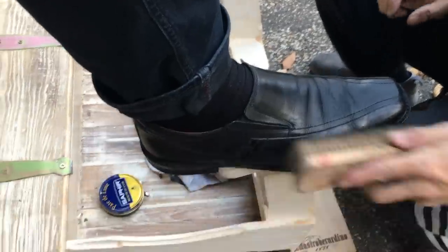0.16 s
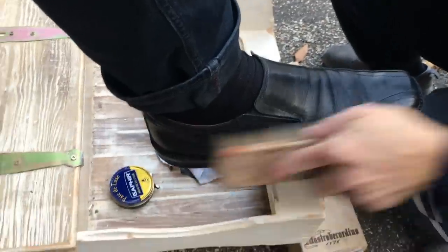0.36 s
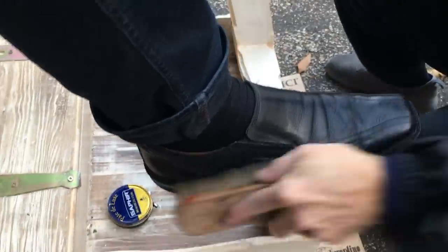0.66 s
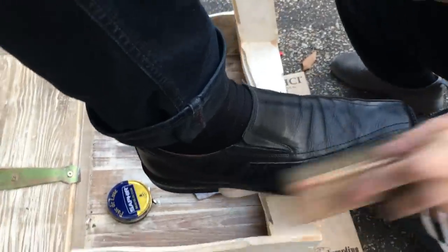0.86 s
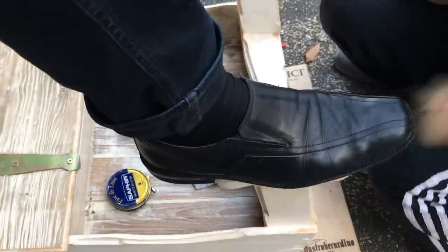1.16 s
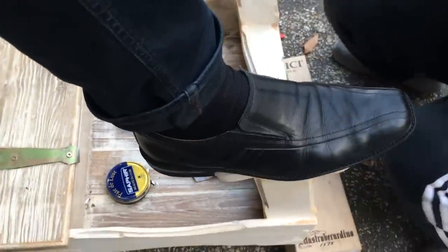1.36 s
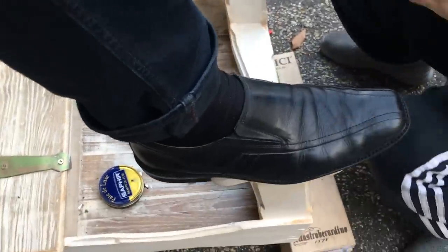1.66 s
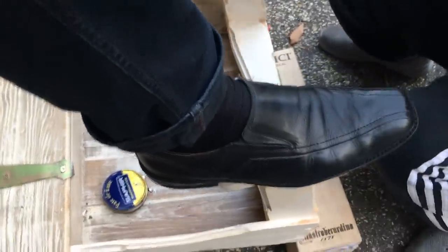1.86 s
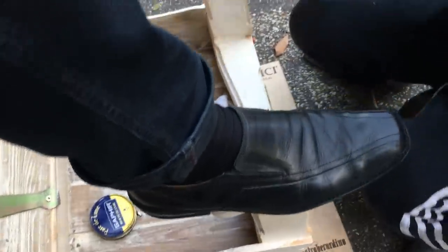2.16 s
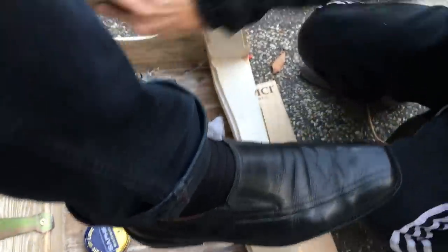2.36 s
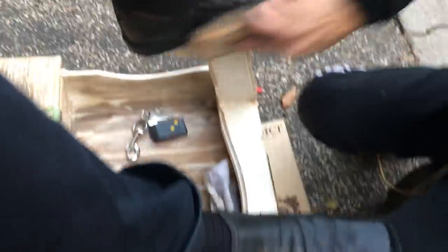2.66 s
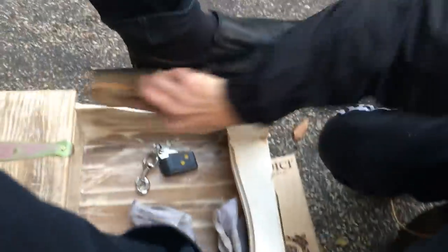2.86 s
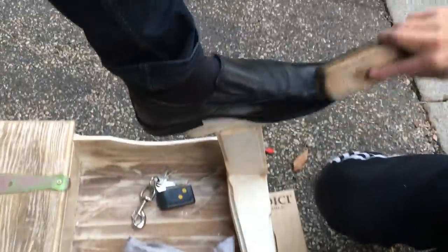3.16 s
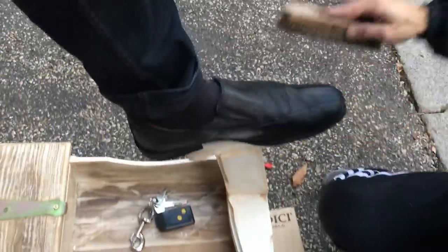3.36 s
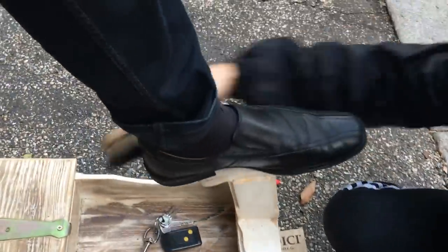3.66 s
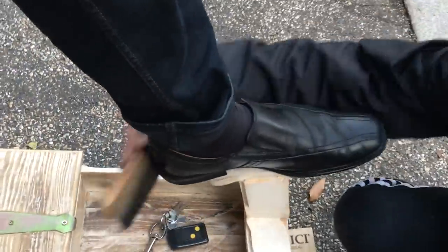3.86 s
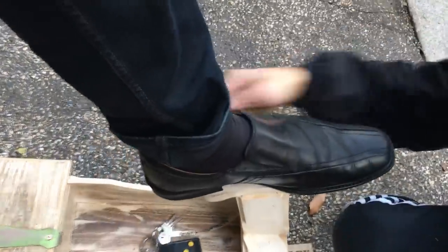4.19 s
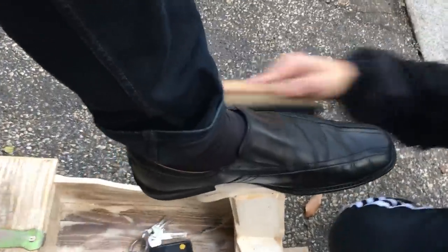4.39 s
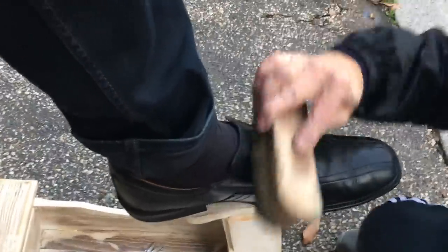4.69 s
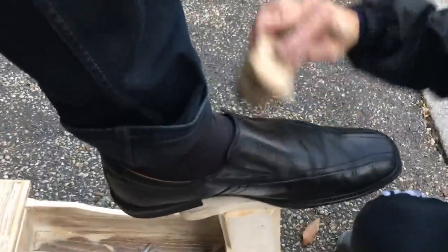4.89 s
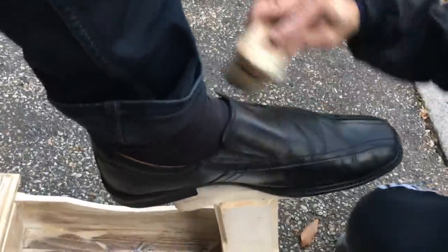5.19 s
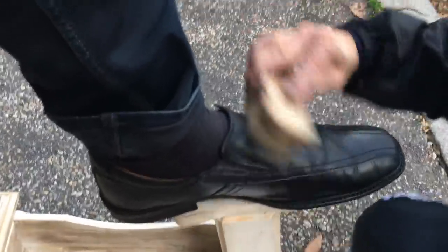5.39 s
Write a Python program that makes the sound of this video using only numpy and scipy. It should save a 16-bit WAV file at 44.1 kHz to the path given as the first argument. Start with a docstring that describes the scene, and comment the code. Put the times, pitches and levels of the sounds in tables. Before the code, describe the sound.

On a street with a steady low traffic rumble, a far engine swells and fades while a shoe brush sweeps quickly over leather, heard from close by. The first bristly swishes sound full and slightly hollow. After a short lull the brushing carries on, finishing in lighter, thinner swipes. Scattered short knocks of the wooden brush against the shoe punctuate the strokes, the sharpest coming early.

```python
"""Hissing strokes of a bristle brush buffing a waxed leather shoe, close by, at a street stand.
Each stroke is a dense patter of slipping bristles that swells and fades with hand speed.
Now and then the brush's wooden back knocks the shoe, ringing the block and thumping the shoe.
Traffic murmurs behind it, and a distant engine pulls away at the start."""
import sys
import numpy as np
from scipy import signal
from scipy.fft import rfft, irfft
from scipy.io import wavfile
from scipy.ndimage import uniform_filter1d

SR = 44100
rng = np.random.default_rng(int(sys.argv[2]) if len(sys.argv) > 2 else 0)


def inscribe(sig):
    """Save sig as 16-bit PCM at rate SR to the path in sys.argv[1].

    A 1-D sig is mono; a 2-D sig holds one channel per row.
    Samples are clipped to [-1, 1] before scaling.
    """
    pcm = np.round(np.clip(np.atleast_2d(sig).T, -1, 1) * 32767)
    wavfile.write(sys.argv[1], SR, pcm.astype(np.int16))


N = 244314
T = np.arange(N) / SR


def undb(db):
    """Decibels to gain."""
    return 10 ** (np.asarray(db) / 20)


def unit(x):
    """Scale to rms 1."""
    return x / np.sqrt(np.mean(x ** 2) + 1e-18)


def colour(x, points):
    """Filter by a spectrum of (f/Hz, gain/dB) points."""
    hz, db = np.transpose(points)
    f = np.arange(len(x) // 2 + 1) * SR / len(x)
    return irfft(rfft(x) * undb(np.interp(np.log(f + 1), np.log(hz), db)), len(x))


def drift(rate_hz, size=2000):
    """Random drift with spread near 1, rate_hz new values a second."""
    return 1.44 * np.interp(T * rate_hz, np.arange(size), rng.standard_normal(size))


def ring(modes, t):
    """Impulse response of damped modes (f/Hz, level/dB, t60/s)."""
    return sum(undb(db - 60 * t / t60) * np.sin(2 * np.pi * hz * t + rng.uniform(0, 2 * np.pi))
               for hz, db, t60 in modes)


def add(out, start_s, x):
    """Mix x into out from start_s."""
    i = int(start_s * SR)
    out[i:i + len(x)] += x[:max(N - i, 0)]


def traffic(level_db=-40.5, waver_db=1.0, split_hz=220):
    """Steady tyre noise above a restless rumble that eases as the engine leaves."""
    # street noise: f/Hz, level/dB
    spectrum = [(27, -46), (39, -11), (56, 4), (85, -9), (130, -11.5), (200, -14.5), (400, -27), (650, -25),
                (1100, -21.5), (1900, -27.5), (2800, -36.5), (4000, -42.5), (7000, -50.5), (15000, -58)]
    # rumble weight: t/s, gain/dB
    rumble_curve = [(0, 1.5), (1.2, 1.5), (1.6, 2), (3, 0), (4.2, -0.5), (5.54, -1)]
    noise = unit(colour(rng.standard_normal(N), spectrum))
    rumble = signal.sosfiltfilt(signal.butter(2, split_hz, fs=SR, output="sos"), noise)
    tyres = noise - rumble
    rumble_db = np.interp(T, *np.transpose(rumble_curve)) + waver_db * drift(9.8)
    return undb(level_db) * (rumble * undb(rumble_db) + tyres)


def distant_engine(waver_db=1.0):
    """Only low exhaust orders carry this far; they rise a little in pitch, swell once and fade."""
    # engine speed: t/s, cycle rate/Hz
    revs = [(0, 37.3), (.42, 38.1), (.72, 40), (1.5, 41.5)]
    # exhaust orders: multiple of cycle rate, level/dB, loudest/s, half-length/s
    exhaust = [(2, -41, 0.24, 0.32), (3, -43.5, 0.99, 0.54), (4, -49, 0.24, 0.58)]
    phase = 2 * np.pi * np.cumsum(np.interp(T, *np.transpose(revs))) / SR
    out = np.zeros(N)
    for order, db, loudest_s, half_s in exhaust:
        swell = np.exp(-((T - loudest_s) / half_s) ** 2)
        out += undb(db + waver_db * drift(9.65)) * swell * np.sin(order * phase)
    return np.sqrt(2) * out


def knocks(crack_db=-5, chatter=0.39, detune=0.043, scatter_db=-9, scatter_s=0.011, level_span_s=0.004):
    """A blow and its chatter ring the brush block and thump the shoe; dull contacts thump most."""
    # wooden back on shoe: t/s, level/dB, brightness/Hz, contact decay/s, thump pitch/Hz
    blows = [(0.262, -34, 2720, 0.014, 670), (0.8673, -26.5, 3900, 0.0021, 405),
             (1.047, -39.5, 1990, 0.0012, 243), (1.839, -34.5, 3000, 0.0028, 260),
             (2.055, -39.5, 3170, 0.0011, 580), (2.067, -34.5, 3100, 0.0062, 630),
             (2.086, -39, 2010, .005, 530), (2.166, -42.5, 2200, 0.0085, 297),
             (2.766, -35, 2400, 0.0031, 228), (3.813, -41, 1900, 0.0071, 182),
             (4.603, -40.5, 7360, 0.00089, 302), (4.644, -36, 5460, 0.0022, 290),
             (4.6544, -28.5, 2370, 0.0029, 188), (4.666, -39, 2310, .019, 394),
             (5.026, -36.5, 5000, 0.0095, 293)]
    # brush block modes: f/Hz, level/dB, t60/s
    block_modes = [(880, -2, 0.016), (1060, -5.5, 0.021), (1290, 1, 0.017), (1570, -3.5, 0.023),
                   (1870, -7, 0.012), (2050, 3, 0.023), (2490, -21, 0.011), (2890, -0.5, 0.0083),
                   (3490, -1, 0.03), (3980, -19, 0.0069), (5420, 2, 0.018), (6140, -3, 0.013)]
    # shoe modes, pitched by the spot struck: multiple of thump pitch, level/dB, t60/s
    shoe_modes = [(1, 3.5, 0.091), (1.31, 4, 0.057), (1.9, 0, 0.067)]
    out, t = np.zeros(N), T[:SR // 6]
    for start_s, level_db, bright_hz, contact_s, thump_hz in blows:
        # the fingers load the block differently at every blow
        gripped = [(hz * np.exp(detune * rng.standard_normal()), db, t60) for hz, db, t60 in block_modes]
        block = ring(gripped, t)
        shoe = ring([(k * thump_hz, db, t60) for k, db, t60 in shoe_modes], t)
        stand = rng.standard_normal(len(t)) * np.exp(-t / scatter_s)  # dense reflections
        contact = chatter * rng.standard_normal(len(t)) * np.exp(-t / contact_s)
        contact[0] += 1  # the blow itself
        band = signal.butter(2, [0.058 * bright_hz, bright_hz], "band", fs=SR, output="sos")
        force = signal.sosfilt(band, contact)
        wood, thump, scatter = (unit(signal.fftconvolve(force, response)[:len(t)])
                                for response in (block, shoe, stand))
        thump_db = 1 - 13.5 * np.log2(bright_hz / 1950)
        knock = wood + undb(crack_db) * unit(force) + undb(thump_db) * thump + undb(scatter_db) * scatter
        add(out, start_s, knock * undb(level_db) * np.sqrt(level_span_s / t[-1]))
    return out


def bristle_slips(flicks_per_s=12000, spread_db=2.5, tuft_db=0.5, grip_db=1.5):
    """Single bristles flick free over a smooth rub; whole tufts catch and let go together."""
    bend = np.minimum(rng.exponential(size=N), 3.5)
    slipping = rng.random(N) < flicks_per_s / SR
    flicks = slipping * rng.standard_normal(N) * undb(spread_db * bend)
    rub = rng.standard_normal(N)
    return unit(unit(flicks) + rub) * undb(tuft_db * drift(170) + grip_db * drift(28))


def tuft_shimmer(x, depth_db=1.5, frame=512):
    """Tufts of different length hiss at their own pitches; the colour shimmers as they come and go."""
    bands = signal.stft(x, nperseg=frame)[2]
    tufts = uniform_filter1d(rng.standard_normal(bands.shape), size=4, axis=0)  # over frequency
    tufts = uniform_filter1d(tufts, size=5, axis=1)  # over time
    return signal.istft(bands * undb(depth_db * unit(tufts)), nperseg=frame)[1][:N]


def sweep_speed(start_s, fastest_s, end_s, turn_s=0.019, rise_power=1.46, fall_power=1.38):
    """The hand speeds up after one turn and slows into the next; bristles slip on through each turn."""
    angle = np.interp(T, [start_s - turn_s, fastest_s, end_s + turn_s], [0, np.pi / 2, np.pi])
    arch = np.where(angle < np.pi, np.sin(angle), 0)
    return arch ** np.where(T < fastest_s, rise_power, fall_power)


def swipe_speed(lands_s, lifts_s, bite_s=0.03, release_s=0.028, sag_db_per_s=-9):
    """The bristles bite quickly, slide on as the hand eases off, and leave the leather."""
    contact = np.clip((T - lands_s) / bite_s, 0, 1) * np.clip((lifts_s - T) / release_s, 0, 1)
    middle_s = (lands_s + lifts_s) / 2
    return contact * undb(sag_db_per_s * (T - middle_s))


def brush(body_hz=1800, centre_hz=5000, sheen_hz=11000, tip_hz=7500, tip_power=0.49):
    """Strokes swell and fade with hand speed; the shoe's flank sounds hollow, the toe cap thin."""
    # bristle hiss on leather: f/Hz, level/dB
    spectrum = [(150, -4), (500, -10.5), (850, -6.5), (1200, -3), (1900, -2), (2700, -3), (3700, -2.5),
                (6000, -3), (7300, -6.5), (8700, -6.5), (12000, -6.5), (15000, -9.5)]
    # long strokes, turn to turn: start/s, fastest/s, end/s, level/dB, leather body/dB
    sweeps = [(-.15, 0.045, 0.19, -46.5, 7), (0.222, 0.283, 0.34, -47.5, 8.5), (0.36, 0.43, 0.57, -45, 10),
              (0.567, 0.634, 0.73, -45.5, 11.5), (0.727, 0.769, 0.89, -43.5, 8),
              (0.877, 0.977, 1.045, -44.5, 8.5), (1.055, 1.105, 1.274, -42.5, 6.5),
              (1.727, 1.878, 2.057, -46.5, 7.5), (2, 2.183, 2.245, -47, 5), (2.252, 2.308, 2.46, -48, 8.5),
              (2.413, 2.61, 2.667, -47.5, 5.5), (2.688, 2.742, 2.865, -44.5, 8),
              (2.902, 3.028, 3.19, -45.5, 7), (3.722, 3.814, 3.9, -48.5, 2), (3.917, 3.943, 4.02, -47, 0.5),
              (3.972, 4.102, 4.185, -49, -1), (4.18, 4.292, 4.36, -46, -1.5),
              (4.351, 4.446, 4.56, -41.5, 1.5), (4.727, 4.833, 4.875, -42.5, -9.5)]
    # swipes and light drags: lands/s, lifts/s, level/dB, leather body/dB
    swipes = [(0.138, 0.237, -57, 6), (1.202, 1.252, -41.5, -3), (1.25, 1.498, -61, -6),
              (1.578, 1.77, -60, -3), (1.737, 1.83, -51.5, 5), (3.09, 3.448, -53, 1),
              (3.237, 3.297, -51, -1), (3.524, 3.86, -52, 3.5), (4.6, 4.67, -52.5, 0),
              (4.63, 4.745, -45.5, -0.5), (4.829, 4.876, -43, 2), (4.923, 5, -51.5, -5),
              (4.964, 5.08, -40.5, 1), (5.075, 5.21, -41, -4.5), (5.269, 5.387, -40, -1),
              (5.38, 5.527, -44, 0)]
    # top treble as the brush works round the shoe: t/s, gain/dB
    sheen = [(0, 3.5), (1.22, 1.5), (1.4, -3.5), (2, 3), (2.75, 6), (3.05, 3.5), (3.25, -2.5), (4.4, 0),
             (5.54, -2.5)]
    hiss = unit(colour(tuft_shimmer(bristle_slips()), spectrum))
    highpass = signal.butter(2, tip_hz, "high", fs=SR, output="sos")
    strokes = [(sweep_speed(*times), db, body_db) for *times, db, body_db in sweeps]
    strokes += [(swipe_speed(*times), db, body_db) for *times, db, body_db in swipes]
    out = np.zeros(N)
    for motion, level_db, body_db in strokes:
        during = np.flatnonzero(motion > 0)
        speed = motion[during]
        patch = hiss[(during + rng.integers(N)) % N]  # each stroke bends other bristles
        sheen_db = np.interp(T[during].mean(), *np.transpose(sheen))
        rub = colour(patch, [(body_hz, body_db), (centre_hz, 0), (sheen_hz, sheen_db)])
        # the finest tip flicks need speed, so turns are duller
        tips = signal.sosfiltfilt(highpass, rub, padlen=0)
        out[during] += (rub - tips + tips * speed ** tip_power) * speed * undb(level_db)
    return out


def scene():
    """All sources at one microphone, on two equal channels."""
    return np.tile(brush() + knocks() + traffic() + distant_engine(), (2, 1))


def record(dry):
    """A phone's microphone port notches the treble twice; a steep low-pass cuts the top."""
    # port response: f/Hz, gain/dB
    port = [(4300, -0.5), (4850, -4), (5400, -1.5), (9500, 3), (10200, -1.5), (10900, 1)]
    top_hz = 15850
    heard = np.array([colour(channel, port) for channel in dry])
    return signal.sosfilt(signal.ellip(10, 0.2, 70, top_hz, fs=SR, output="sos"), heard)


dry = scene()
out = record(dry)
inscribe(out)
```